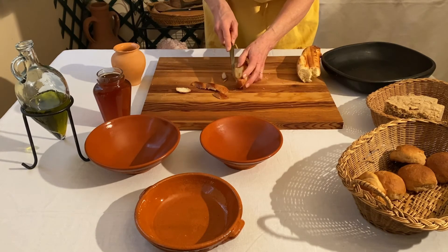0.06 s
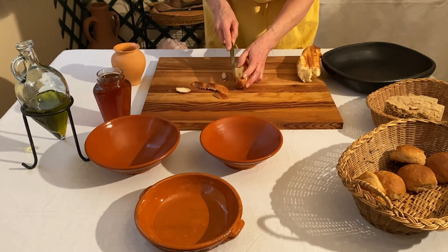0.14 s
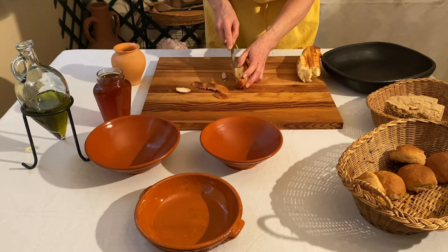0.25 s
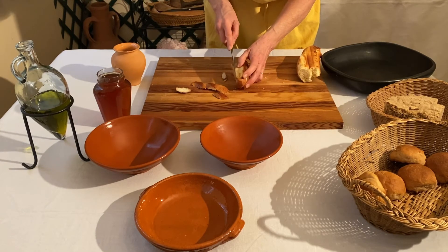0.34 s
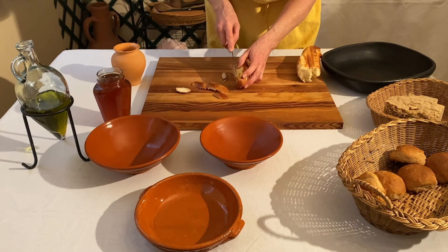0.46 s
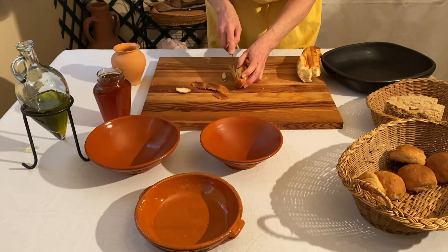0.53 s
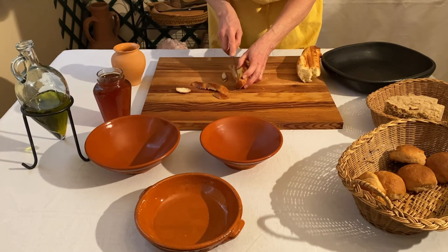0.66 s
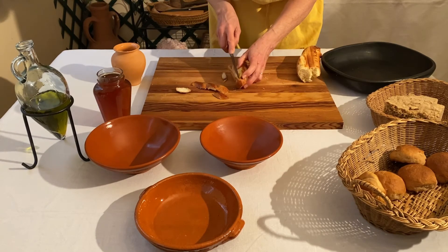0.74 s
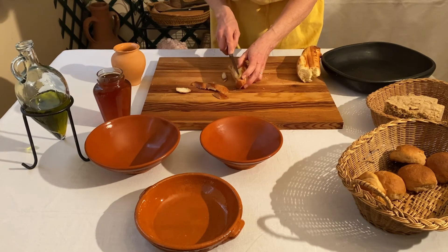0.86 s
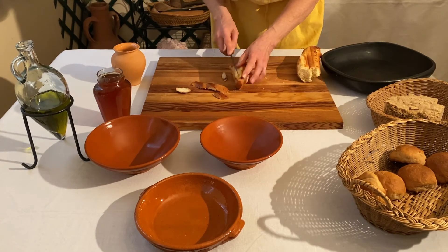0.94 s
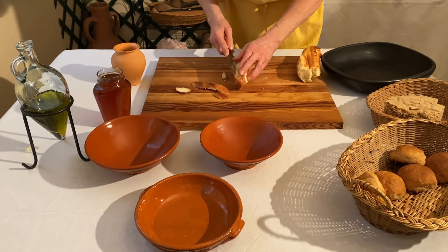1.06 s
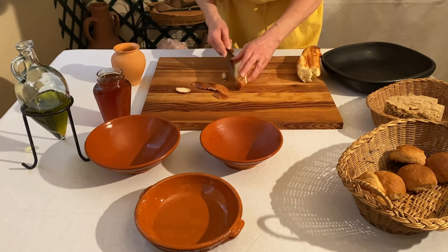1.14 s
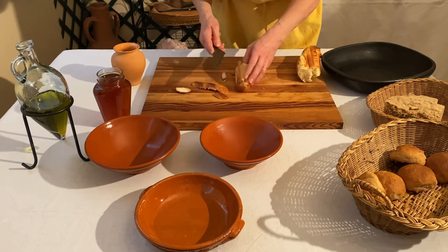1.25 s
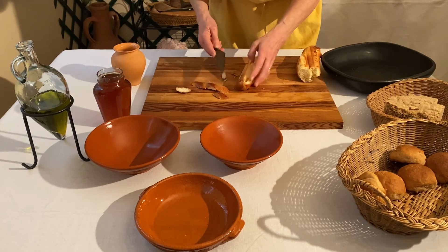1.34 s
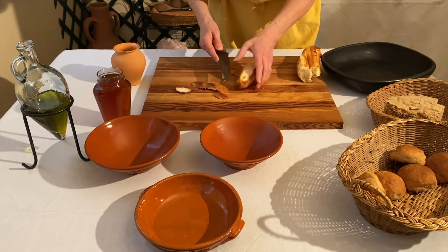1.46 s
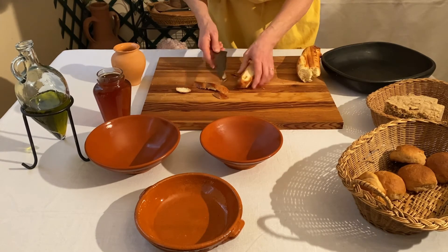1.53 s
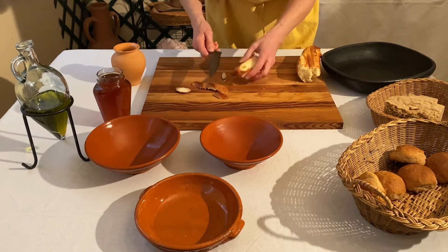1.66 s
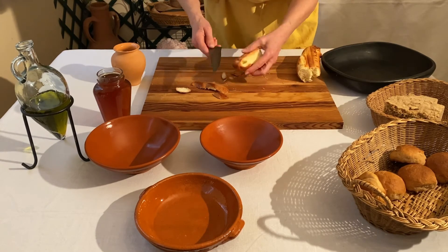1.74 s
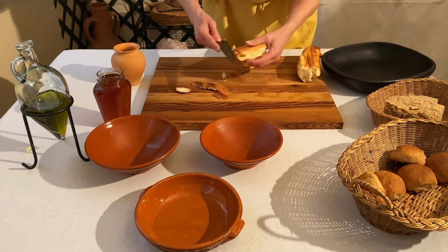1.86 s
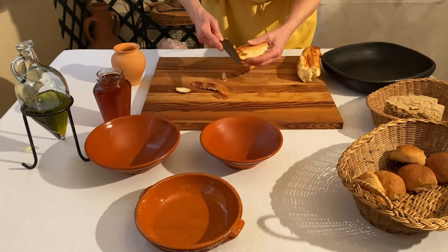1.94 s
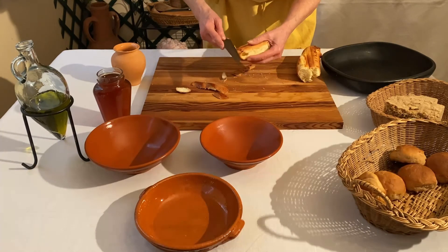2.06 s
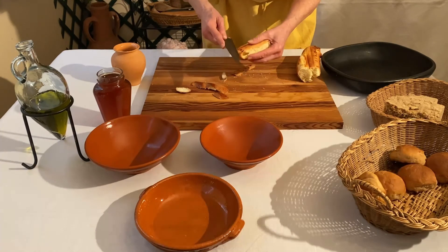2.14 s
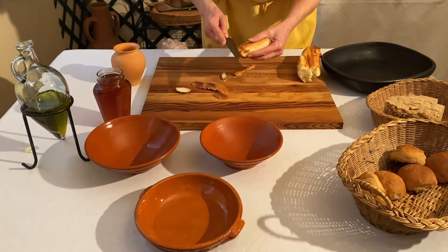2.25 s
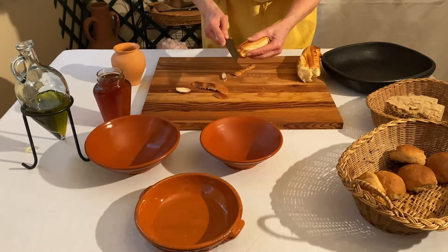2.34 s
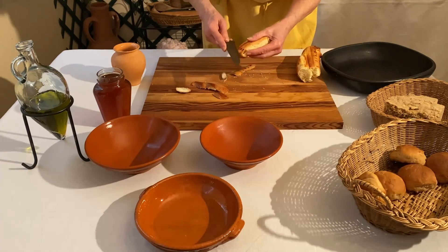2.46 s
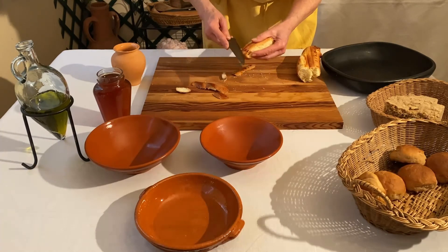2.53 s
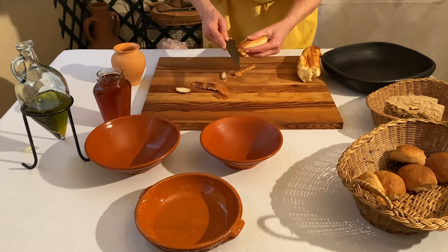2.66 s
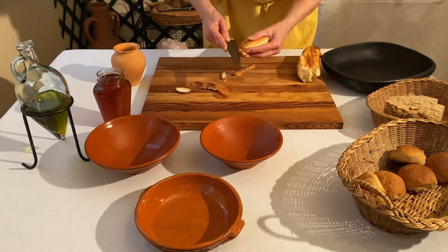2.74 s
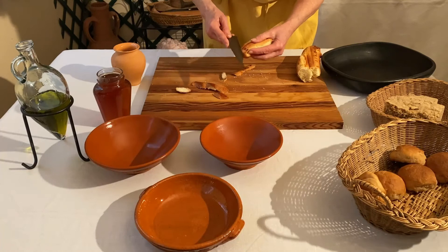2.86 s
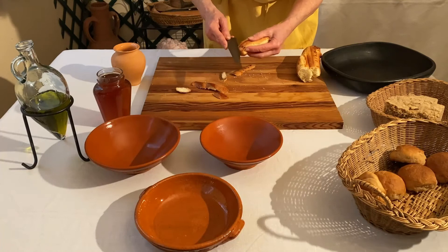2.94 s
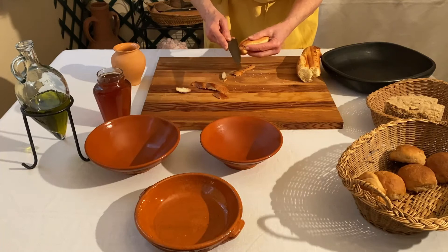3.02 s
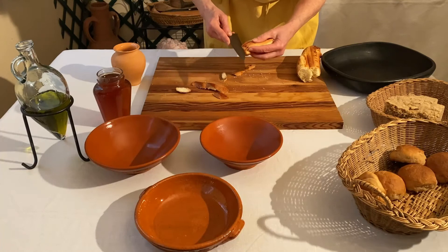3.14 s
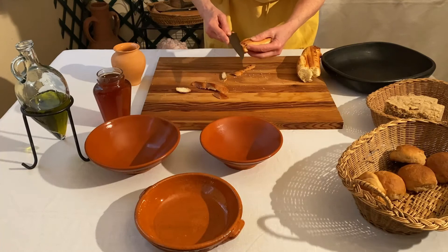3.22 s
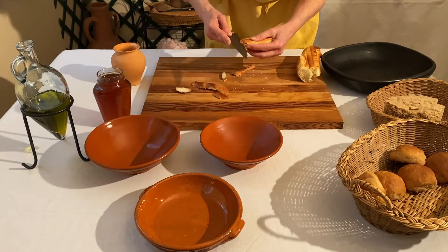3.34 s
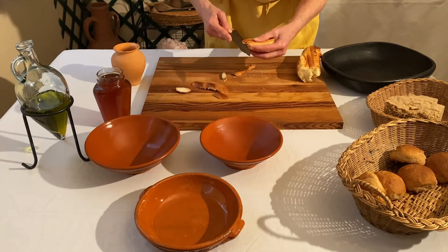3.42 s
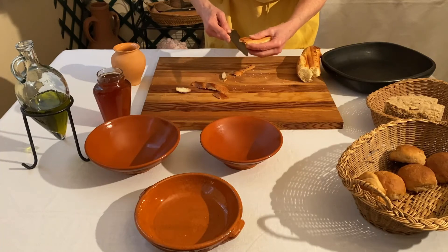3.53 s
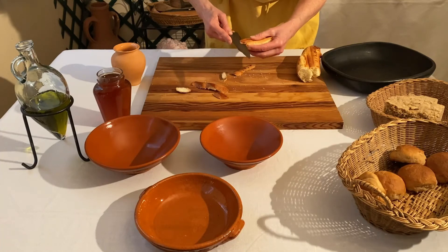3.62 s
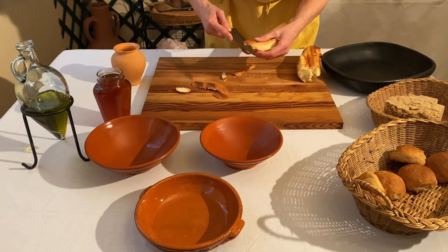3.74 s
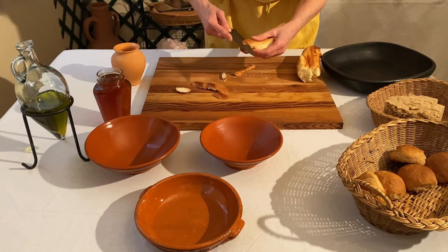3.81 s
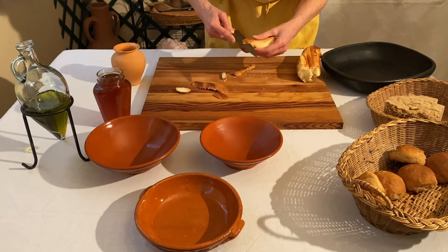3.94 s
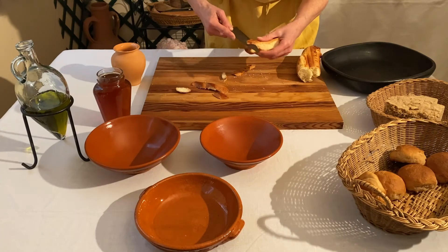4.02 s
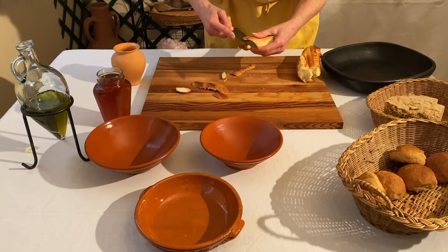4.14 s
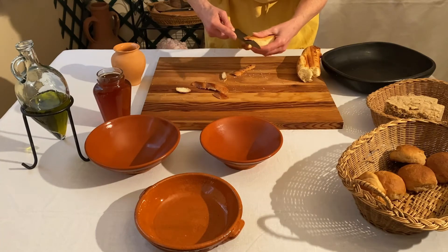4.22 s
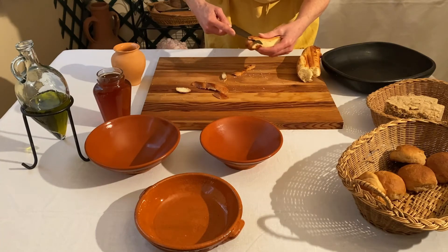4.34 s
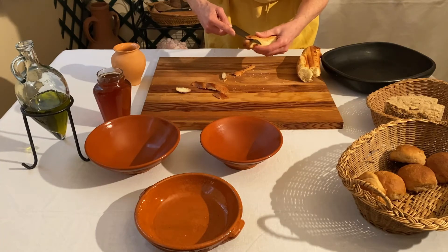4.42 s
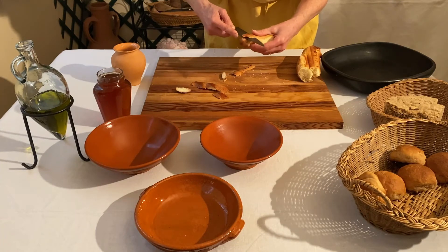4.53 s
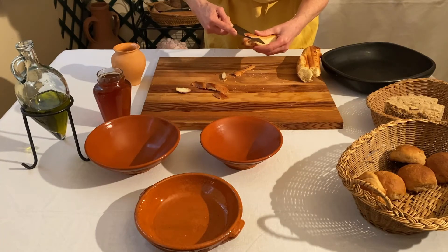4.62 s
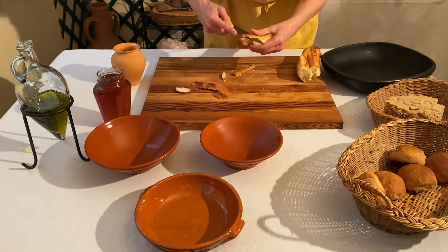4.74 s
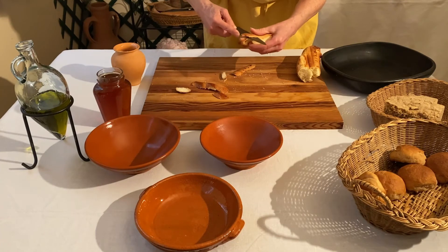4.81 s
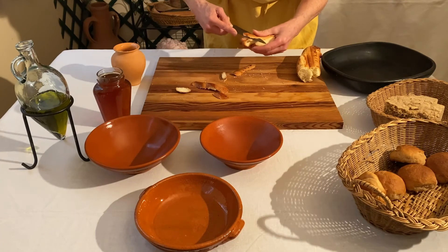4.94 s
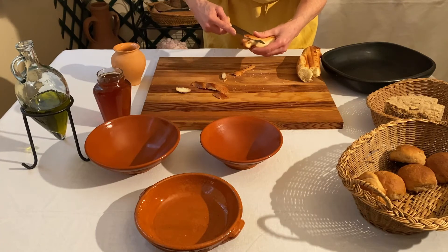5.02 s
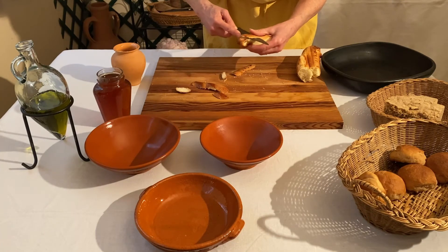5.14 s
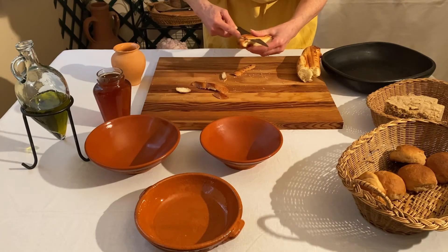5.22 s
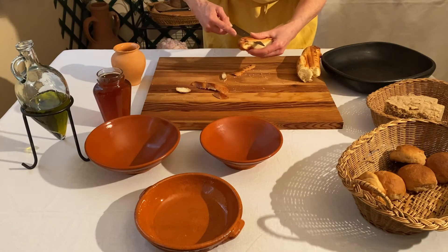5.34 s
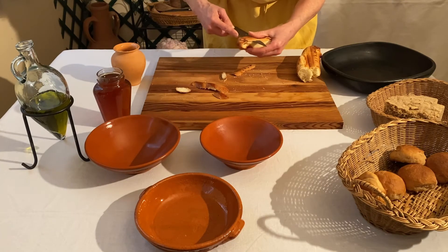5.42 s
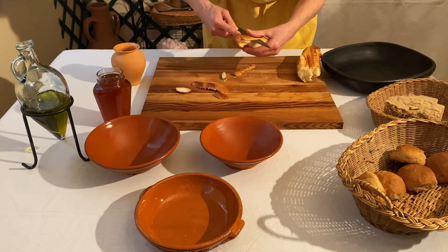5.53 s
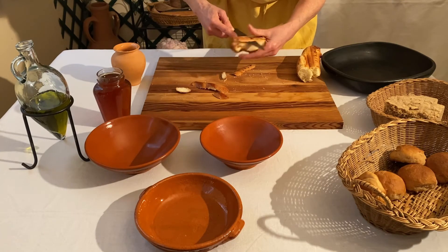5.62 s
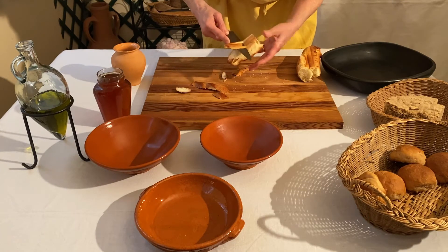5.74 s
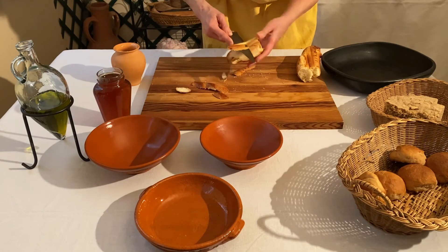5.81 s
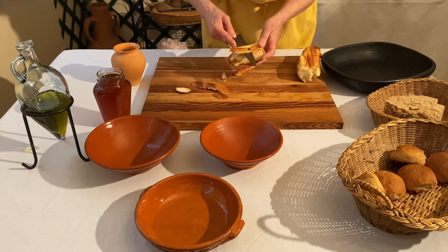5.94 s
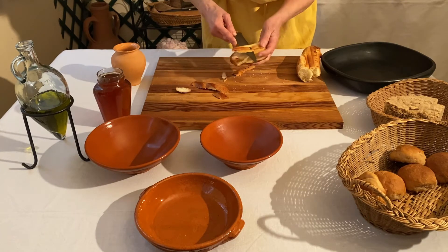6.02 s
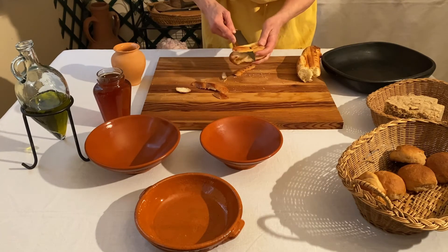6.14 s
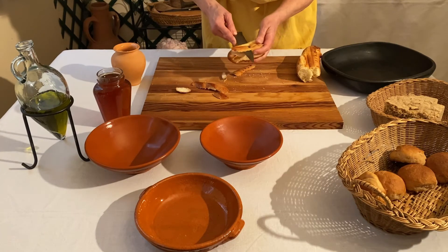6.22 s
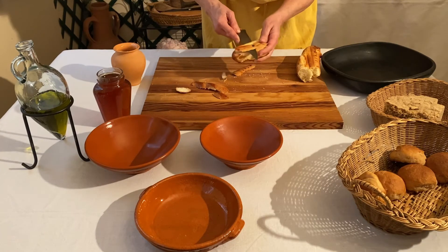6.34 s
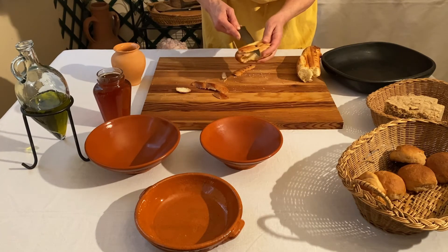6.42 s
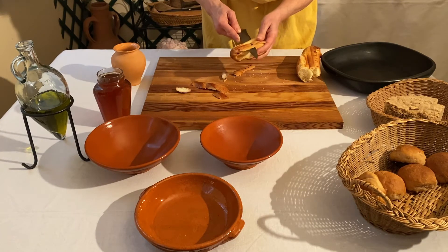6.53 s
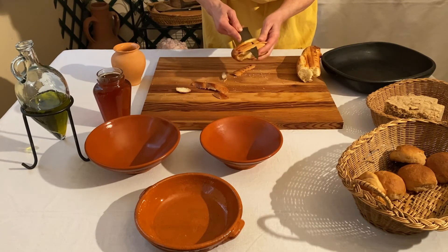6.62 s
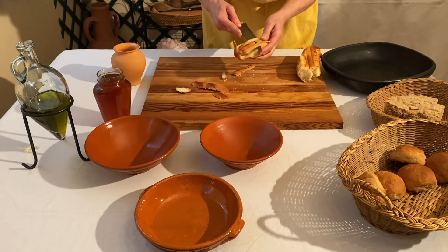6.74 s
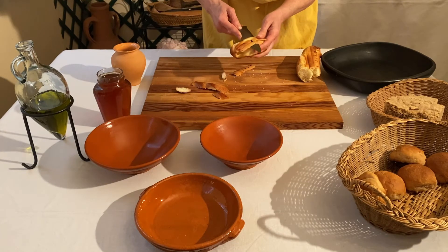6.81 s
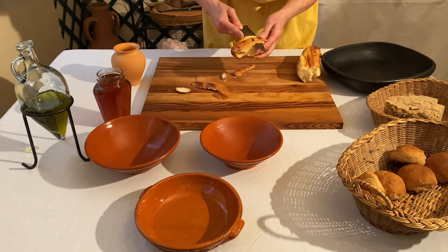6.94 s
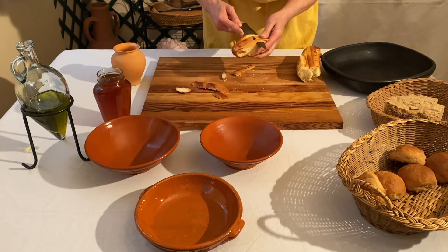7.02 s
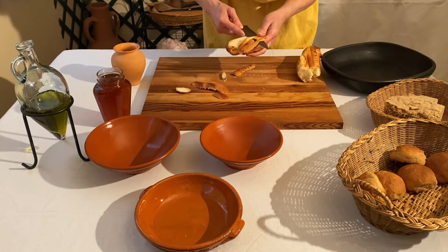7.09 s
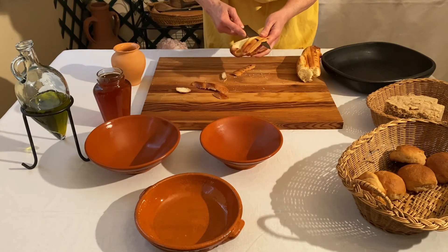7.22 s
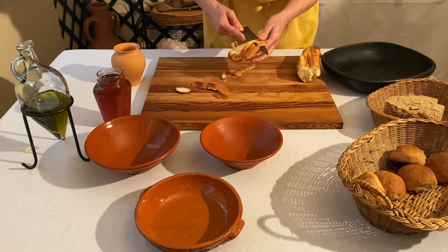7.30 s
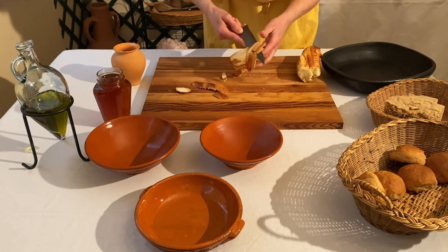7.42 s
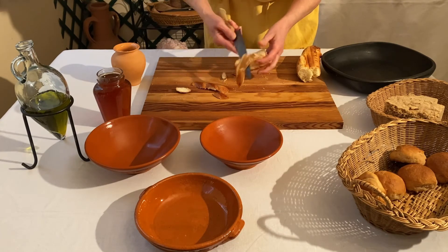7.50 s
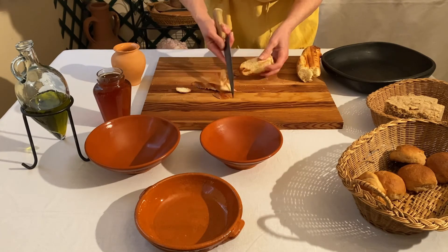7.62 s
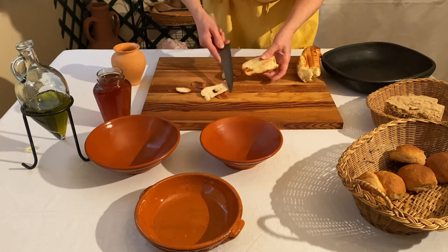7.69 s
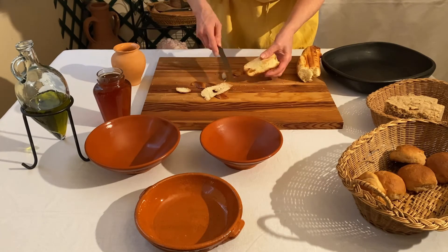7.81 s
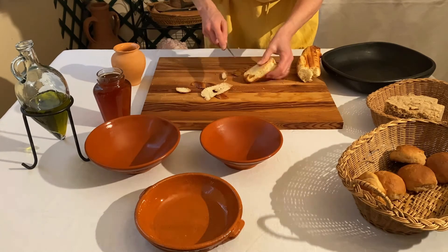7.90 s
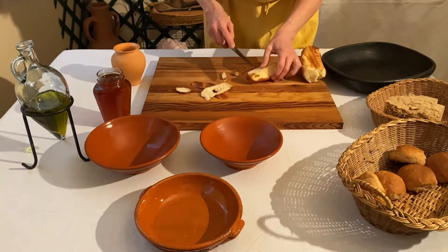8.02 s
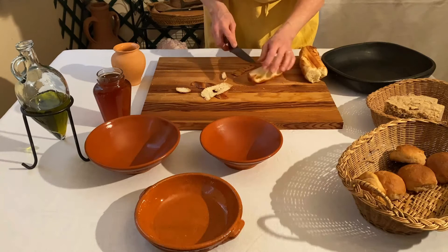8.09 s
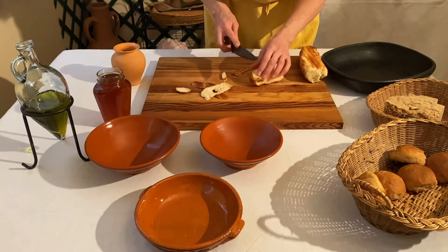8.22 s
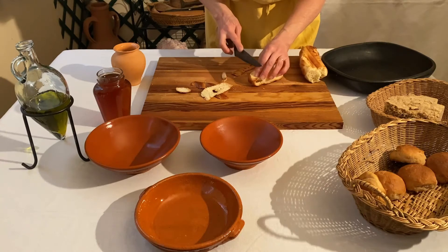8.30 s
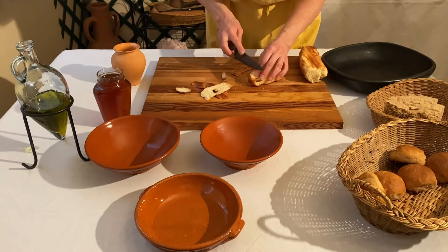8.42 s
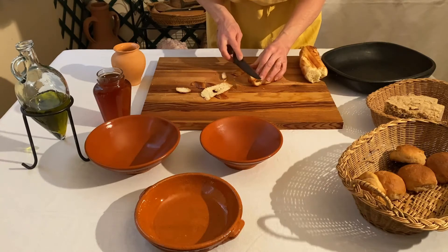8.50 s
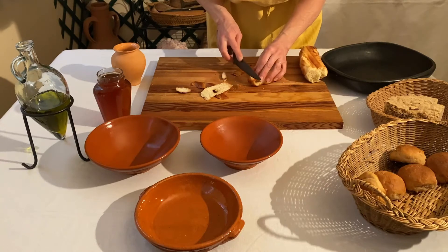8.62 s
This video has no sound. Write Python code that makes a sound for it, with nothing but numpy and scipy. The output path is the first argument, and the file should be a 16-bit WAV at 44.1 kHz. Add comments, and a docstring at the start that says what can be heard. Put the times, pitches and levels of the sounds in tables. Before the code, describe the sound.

Knife and bread roll on a wooden board, heard quietly by two close microphones indoors. First come uneven knocks, a narrow dry rasp and bright little blade rings; then a long run of light sawing, dry crust scratch with high metallic fizz, about seven strokes a second. A brief fumbling pause, more strokes, then the loudest knock, skittering crust and muffled thumps, over unsteady low hum and rumble.

```python
"""In a small, live room with a low swelling hum, a knife cuts a bread roll on a wooden board.
Knocks excite the board's modes, a narrow noise rasps near 2 kHz as the roll is handled, and touched
steel rings thinly. The roll is then held in the air and its crust sawn in quick, faint noise strokes.
At last a piece drops on the board with a sharp knock, crust skitters and the rest is set down.
Two closely spaced microphones hear the sounds with a dense decaying tail of room noise."""
import sys
import numpy as np
from scipy import signal
from scipy.fft import rfft, irfft
from scipy.io import wavfile

SR = 44100
rng = np.random.default_rng(int(sys.argv[2]) if len(sys.argv) > 2 else 0)


def file_out(sig):
    """Save sig as 16-bit WAV at sys.argv[1]."""
    # one column per channel
    cols = np.atleast_2d(sig).T
    # limit, then scale
    lim = np.clip(cols, -1, 1)
    pcm = np.round(lim * 32767).astype(np.int16)
    wavfile.write(sys.argv[1], SR, pcm)


N = 381766
TIME = np.arange(N) / SR  # s

# relative noise spectrum of grit at the steel edge: (f/Hz, density/dB)
FIZZ_SPECTRUM = [(100, -58), (3000, -4), (5500, -4), (7500, -4), (9000, 1.5), (11400, -4), (13000, 3),
                 (14500, 2.5), (15800, -9.5)]


def amp(db):
    """Logarithmic level: decibels to amplitude gain."""
    return 10 ** (np.asarray(db) / 20)


def unit(x):
    """Normalisation to a root-mean-square of 1."""
    return x / np.sqrt(np.mean(x ** 2) + 1e-20)


def read(points, hz):
    """Linear interpolation of a table on a logarithmic frequency axis."""
    f, value = np.transpose(points)
    return np.interp(np.log(hz + 1), np.log(f + 1), value)


def add(mix, s, sound):
    """Superposition: a sound is added in place from time s."""
    part = mix[max(round(s * SR), 0):][:len(sound)]
    part += sound[:len(part)]


def through(x, response):
    """Linear system: a sound convolved with an impulse response."""
    return signal.fftconvolve(x, response)[:N]


def colour(spectrum, size=4096):
    """Minimum phase: the causal response, of energy 1, that has the given relative spectrum."""
    log_gain = np.log(amp(read(spectrum, abs(np.fft.fftfreq(size, 1 / SR)))))
    response = np.fft.ifft(np.exp(np.conj(signal.hilbert(log_gain)))).real
    return response / np.linalg.norm(response)


def ring(modes):
    """Modal superposition: exponentially dying sines, with total energy 1."""
    t = TIME[:SR]
    response = np.zeros(SR)
    for k, (hz, db, t60) in enumerate(modes):
        sign = (-1) ** k
        response += sign * amp(db - 60 * t / t60) * np.sin(2 * np.pi * hz * t)
    return response / np.linalg.norm(response)


def resonances(peaks):
    """Bandwidth and decay are reciprocal: broad peaks become quickly dying modes, with energy 1."""
    modes = []
    for hz, width_hz, db in peaks:
        t60 = np.log(1000) / np.pi / width_hz
        modes.append((hz, db + 20 * np.log10(width_hz), t60))
    return ring(modes)


def resonate(x, hz, width_hz):
    """Heterodyne resonator: a one-pole filter in a frame that turns with hz, with gain 1 at its peak."""
    turn = np.exp(2j * np.pi * np.cumsum(hz) / SR)
    r = np.exp(-np.pi * width_hz / SR)
    baseband = signal.lfilter([1 - r], [1, -r], x / turn + 1e-18)
    return 2 * (turn * baseband).real


def burst(envelope):
    """Transient noise: an enveloped puff with energy 1."""
    noise = rng.standard_normal(len(envelope)) * envelope
    return noise / np.linalg.norm(noise)


def wander(rate_hz):
    """Low-pass random process: slow Gaussian motion of rms 1."""
    hz = np.fft.rfftfreq(N, 1 / SR)
    return unit(irfft(rfft(rng.standard_normal(N)) * np.exp(-(hz / rate_hz) ** 2), N))


def crumbs(per_s, spread_db, smooth):
    """Shot noise: tiny random impulses of uneven size over smooth noise."""
    sizes = amp(spread_db * np.minimum(rng.exponential(1, N), 4)) * rng.choice([-1, 1], N)
    impulses = unit(sizes * (rng.random(N) < per_s / SR))
    return unit(impulses + smooth * rng.standard_normal(N))


def diffuse(pair):
    """Spatial coherence: common and opposed parts set how alike the two microphones sound per band."""
    # coherence of the sound at the microphones: (f/Hz, correlation)
    coherence = [(40, 1), (130, 0.71), (250, 0.76), (450, 0.01), (1300, 0.021), (2200, 0.45), (5300, 0.35),
                 (7000, 0.99), (16000, 0.89)]
    size = pair.shape[1]
    same = np.clip(read(coherence, np.fft.rfftfreq(size, 1 / SR)), -1, 1)
    mid, side = rfft(pair) * np.sqrt([(1 + same) / 2, (1 - same) / 2])
    return irfft(np.array([mid + side, mid - side]), size)


def room(x, wet_db, left_db, build_s=0.00044):
    """Reverberation: direct sound plus a dense noise tail whose treble dies faster."""
    # reverberation of the room: (f/Hz, t60/s)
    reverberation = [(100, 0.56), (500, 0.39), (2000, 0.26), (6000, 0.22), (15000, 0.1)]
    hz, t, z = signal.stft(diffuse(rng.standard_normal((2, SR))), SR, nperseg=256)
    decay = amp(-60 * t / read(reverberation, hz)[:, None])
    tail = signal.istft(z * decay, SR, nperseg=256)[1][:, :SR]
    build = 1 - np.exp(-(TIME[:SR] / build_s) ** 2)
    tail *= build / np.sqrt(np.sum(tail ** 2) / 2)
    pair = x + amp(wet_db) * np.array([through(x, side) for side in tail])
    balance = amp([[left_db / 2], [-left_db / 2]])
    return pair * balance / np.hypot(1, amp(wet_db))


def ambience(lump_db=5.5):
    """Diffuse background: lumpy low rumble, faint hiss and steady pure tones."""
    # relative noise spectrum of the air: (f/Hz, density/dB)
    air_spectrum = [(20, -23), (30, -14.5), (45, 5.5), (80, -1.5), (115, 4.5), (160, -5), (220, -15.5),
                    (400, -16), (750, -24), (1200, -29), (2200, -33), (4500, -38), (9000, -43.5),
                    (13000, -42), (16000, -56)]
    # faint steady tones: (f/Hz, rms level/dB)
    tones = [(437, -80), (778, -82)]
    noise = diffuse(rng.standard_normal((2, N)))
    air = amp(-52.0) * unit(np.array([through(side, colour(air_spectrum)) for side in noise]))
    rumble = signal.sosfiltfilt(signal.butter(2, 250, fs=SR, output="sos"), air)
    lumps = amp(lump_db * np.tanh(wander(rate_hz=6.2)))
    whine = sum(np.sqrt(2) * amp(db) * np.sin(2 * np.pi * hz * TIME) for hz, db in tones)
    return air - rumble + rumble * lumps + whine


def hum(centre_hz=132.5, drift_hz=4.11, flutter=0.32, throb_db=4.0, throb_hz=7):
    """Amplitude and frequency modulation: a low sine swells, throbs at random and wavers in pitch."""
    # slow swell, before throb and channel balance: (t/s, level/dB)
    swell = [(0, -66), (.5, -62), (.58, -41), (.69, -67), (.8, -52.5), (.91, -42), (1.02, -49.5),
             (1.09, -60), (1.28, -52), (1.66, -51), (1.83, -58.5), (1.95, -61), (2.1, -59), (2.4, -71),
             (2.62, -59.5), (2.93, -59), (3.02, -43.5), (3.2, -48), (3.36, -74), (3.85, -50.5),
             (4.3, -63.5), (4.53, -48), (4.8, -67), (5.03, -50), (5.3, -59.5), (5.55, -47.5), (5.65, -37),
             (5.76, -75), (5.89, -44.5), (6.0, -64), (6.35, -50), (6.75, -62.5), (7.05, -56.5),
             (7.19, -44.5), (7.33, -65.5), (7.49, -42.5), (7.6, -50), (7.8, -42), (7.95, -49),
             (8.08, -33.5), (8.2, -43), (8.35, -44.5), (8.5, -56.5), (8.66, -56)]
    turns = np.cumsum(centre_hz + drift_hz * wander(rate_hz=18.5)) / SR
    throb = throb_db * np.tanh(wander(rate_hz=throb_hz))
    level = amp(np.interp(TIME, *np.transpose(swell)) + throb)
    level = level * (1 + flutter * wander(rate_hz=25.0))
    balance = amp([[-3.5], [.8]])  # left, right
    return np.sqrt(2) * level * np.sin(2 * np.pi * turns) * balance


def sliding(rise_s=0.0076, handling_db=-76.5):
    """Dry friction: fine grains of bread and hands on wood build, hold and die away with each push."""
    # bread pushed over the board: (start t/s, end t/s, relative level/dB, fall/(dB per s))
    pushes = [(-.05, 0.01, -58.5, 54), (0.483, 1.175, -65.5, 70), (1.179, 1.267, -59, 90),
              (1.297, 1.615, -58.5, 74), (1.846, 1.962, -67, 45), (5.454, 5.505, -59.5, 218),
              (5.797, 6.25, -68, 68), (7.555, 7.817, -56.5, 86), (7.924, 8.026, -51, 93)]
    # relative noise spectrum of the friction: (f/Hz, density/dB)
    friction_spectrum = [(40, 0.5), (150, -5), (400, -0.5), (800, -2), (1300, -7), (2200, -9.5),
                         (4000, -25.5), (8000, -35), (16000, -33)]
    level = np.full(N, amp(handling_db))  # between pushes the fingers keep rubbing the crust
    for start, end, db, fall_db_per_s in pushes:
        rise = np.clip((TIME - start) / rise_s, 0, 1)
        level = np.maximum(level, rise * amp(db - fall_db_per_s * np.maximum(TIME - end, 0)))
    grains = crumbs(per_s=1100, spread_db=3.2, smooth=.6)
    unsteady = amp(5.7 * np.tanh(wander(rate_hz=33)))
    return room(through(level * unsteady * grains, colour(friction_spectrum)), wet_db=0, left_db=3.0)


def knocks(snap_s=0.0011, uneven=0.14):
    """Impact excitation: force pulses drive board and crust, and longer contacts sound duller."""
    # knocks of bread and knife on the board, levels relative: (t/s, thud level/dB, first contact/ms,
    # crust crack level/dB, change per rebound/dB, board ring against thud/dB)
    impacts = [(.575, -15, 3.45, -39, -17, 4), (1.111, -21.5, 3.1, -33, -20, 2),
               (1.213, -25.5, 0.22, -24.5, -6, -5), (1.252, -29, 0.34, -24, -13, 6),
               (1.534, -22.5, 0.6, -23.5, 2, 10), (1.679, -31, 0.55, -32, -11, 9),
               (1.864, -14, 2.3, -52, -7, -4), (1.888, -10.5, 2.46, -44, -22, -4),
               (1.925, -21, 0.33, -25.5, -23, -11), (5.498, -27, 0.78, -43, -22, -4),
               (5.804, -30, 0.94, -36, -0.5, -2), (6.609, -27.5, 0.76, -48, -24, -7),
               (7.565, -14, 1.5, -27, -24, 7.5), (7.6472, -11, 0.15, -15.5, -18, 2.5),
               (7.651, -0.5, 0.73, -29, -20, 5), (7.686, -15.5, 0.17, -29, 1.5, 0),
               (7.914, -16, 1.26, -22.5, -14, 4), (7.964, -27, 0.49, -24, -11, 4),
               (7.996, -9.5, 0.9, -26.5, -23, -8), (8.03, -12, 2.3, -26, -13, -8),
               (8.048, -4, 3.2, -54, -21, -9), (8.085, -12, 3.2, -59, -19, -6),
               (8.15, -28, 0.39, -44, -11, 0), (8.268, -24, 1, -45.5, -2.5, -2),
               (8.547, -32.5, 1.1, -46, -16, -2)]
    # modes of the wooden board: (f/Hz, relative level/dB, t60/s)
    board_modes = [(132, -15, .6), (165, -15, .3), (234, -11, .38), (326, -10.5, .2), (430, -5, .26),
                   (529, -1.5, .42), (555, -5, .28), (590, 9.5, .04), (696, -5, .18), (817, -8, .25),
                   (855, -12, .22), (944, -10, .25), (985, -5, .07), (1043, -14, .25), (1346, -13, .3),
                   (1420, -16, .2), (1782, -14, .28), (1945, -18, .25), (2520, -7.5, .36), (2680, -9, .2),
                   (2923, -15, .25), (3445, -18, .3), (3850, -18, .2), (4177, -17, .25), (5534, -19, .25)]
    # relative spectrum of the thud: (f/Hz, density/dB)
    thud_spectrum = [(40, -17), (80, 4), (170, -5.5), (330, 1.5), (550, 1.5), (950, 0), (1200, -15.5),
                     (2000, -11.5), (2800, -6), (4000, -29), (16000, -30)]
    # relative spectrum of the cracking crust: (f/Hz, density/dB)
    crack_spectrum = [(100, -8), (700, 5), (1500, 20), (2800, 8.5), (4000, 11.5), (6500, 2.5), (9000, -11),
                      (12000, 0.5), (16000, 2)]
    rebounds, rebound_s = 2, .035  # the bread rocks to rest
    soften = 1.8  # each contact lasts this many times longer than the last
    rebound_ring_db = -5.5  # the settling bread damps the board
    thud, flex, crack = np.zeros((3, N))
    t = TIME[:SR // 20]
    for s, thud_db, contact_ms, crack_db, rebound_db, ring_db in impacts:
        for k in range(1 + rebounds):
            at = s + k * rebound_s * (1 + uneven * rng.uniform(-1, 1))
            push = np.sin(np.pi * np.minimum(1000 * t / (contact_ms * soften ** k), 1)) ** 2
            push = push / push.sum()
            flex_db = thud_db + ring_db + k * (rebound_db + rebound_ring_db)
            snap = burst(np.exp(-t / snap_s))
            add(thud, at, amp(thud_db + k * rebound_db) * push)
            add(flex, at, amp(flex_db) * push)
            add(crack, at, amp(crack_db + k * rebound_db) / soften ** k * snap)
    body = room(amp(2.0) * through(thud, colour(thud_spectrum)), wet_db=3.5, left_db=0.5)
    modes = room(amp(-1) * through(flex, ring(board_modes)), wet_db=-8, left_db=3.5)
    crust = room(amp(1.0) * through(crack, colour(crack_spectrum)), wet_db=4.5, left_db=1.5)
    return body + modes + crust


def blade(tick_s=0.0011, graze_s=0.009, swell_s=0.013, left_db=0.5):
    """Modal damping: free steel rings on, held steel swells to a short gritty note, bent steel sounds low."""
    # the blade touches board or crust, levels relative: (t/s, tick level/dB, free ring level/dB,
    # ring held against the bread level/dB, low bending note level/dB)
    touches = [(1.112, -24.5, -45, -52, -50), (1.203, -31, -50, -23, -44), (1.533, -29, -25, -41, -45),
               (1.927, -30, -46, -48, -40), (5.803, -37, -48, -46, -55), (7.097, -44, -60, -73, -65),
               (7.647, -31, -50, -43, -45), (7.934, -31, -55, -44, -50), (8.227, -54, -49, -27.5, -28)]
    # modes of the free blade: (f/Hz, relative level/dB, t60/s)
    free_modes = [(2665, -14, .28), (4350, -16, .4), (5500, -14, .25), (7850, -14, .3), (10590, -1, .44),
                  (11830, -7, .46), (15220, -13, .25)]
    # modes of the blade held against the bread: (f/Hz, relative level/dB, t60/s)
    held_modes = [(3850, -15, .08), (6600, -11, .08), (9330, -3, .09), (10910, 3, .08), (12600, -3, .07),
                  (14160, -3, .06), (14750, -7, .06)]
    # mode of the bending blade: (f/Hz, relative level/dB, t60/s)
    bent_modes = [(2265, 0, .16)]
    tick, graze, free, held, bent = np.zeros((5, N))
    t = TIME[:SR // 10]
    for s, tick_db, free_db, held_db, bent_db in touches:
        add(tick, s, amp(tick_db) * burst(np.exp(-t / tick_s)))
        add(graze, s, amp(held_db) * burst(t * np.exp(-t / graze_s)))
        add(free, s, amp([free_db]))
        add(held, s, amp([held_db]))
        add(bent, s + graze_s, amp([bent_db]))  # the steel springs back at the height of the graze
    swell = 1 - np.exp(-(TIME[:SR] / swell_s) ** 2)
    grit = through(tick + amp(-5.0) * graze, colour(FIZZ_SPECTRUM))
    steel = through(free, ring(free_modes))
    steel = steel + amp(9) * through(held, swell * ring(held_modes))
    steel = steel + through(bent, swell * ring(bent_modes))
    contact = room(amp(5.5) * grit, wet_db=2.5, left_db=left_db)
    return contact + room(amp(3.0) * steel, wet_db=-8, left_db=left_db)


def narrow_rasp(waver_oct=.035, catch_db=0.5):
    """Filtered noise: uneven grains through narrow, wavering resonances make a faint rasp near 2 kHz."""
    # faint narrow rasps during handling: (start t/s, end t/s, level/dB, centre f/Hz)
    rasps = [(1, 1.323, -67, 1900), (1.047, 1.07, -62, 1930), (1.315, 1.506, -59, 1870),
             (2.942, 3.2, -75, 1980), (3.367, 3.5, -68.5, 1850), (3.688, 3.747, -68.5, 2150),
             (3.837, 3.88, -73, 2070), (3.98, 4.05, -73, 1880), (4.12, 4.17, -73, 1950),
             (4.284, 4.66, -77, 1810), (4.436, 4.48, -73, 1800), (5.45, 5.495, -64, 1990),
             (5.7, 5.808, -72, 1770), (5.87, 5.93, -72, 1890), (5.907, 6.215, -73, 1800),
             (7.535, 7.915, -59.5, 2000)]
    rise_s, fall_db_per_s = 0.007, 260
    width_hz = 340  # of each of two cascaded resonators
    partials = [(1, 0), (1.555, -14)]  # frequency ratio, level/dB: a weaker, higher resonance
    out = np.zeros(N)
    grains = crumbs(per_s=450, spread_db=2.0, smooth=0.23)
    grains = grains * amp(catch_db * np.tanh(wander(rate_hz=20)))
    waver = 2 ** (waver_oct * wander(rate_hz=15))
    for start, end, db, hz in rasps:
        first = round(start * SR)
        part = slice(first, first + SR)
        t = np.maximum(TIME[part] - start, 0)
        fall_db = fall_db_per_s * np.maximum(t - (end - start), 0)
        level = np.minimum(t / rise_s, 1) * amp(db - fall_db)
        for ratio, share_db in partials:
            pitch = ratio * hz * waver[part]
            rasp = resonate(resonate(grains[part], pitch, width_hz), pitch, width_hz)
            add(out, start, amp(share_db) * level * unit(rasp))
    return room(out, wet_db=-9.0, left_db=1.0)


def sawing(sharpness=1.58, bite=1.0, catch_db=1.5, snag_db=2.0):
    """Speed-driven fracture noise: crumbling crust and a singing edge swell and fade in each stroke."""
    # strokes of the blade, and crust skittering after the drop, levels relative:
    # (middle t/s, crust rasp level/dB, fizz level/dB)
    strokes = [(0.587, -71, -71), (0.77, -73.5, -68.5), (0.947, -71, -73), (1.125, -64, -72.0),
               (1.242, -57, -63), (1.35, -67, -75), (1.46, -70.5, -74), (1.56, -60, -68), (1.69, -69, -73),
               (1.875, -68.5, -64), (2.03, -68, -80), (2.415, -73.5, -70), (2.555, -71.5, -60),
               (2.687, -71.5, -61.5), (2.824, -70, -61), (2.962, -75, -62), (3.117, -65.5, -60.5),
               (3.27, -75.5, -63), (3.415, -70, -61.5), (3.556, -78, -69), (3.718, -71, -63.5),
               (3.865, -71.5, -66.5), (4.013, -66, -61.5), (4.153, -73, -67.5), (4.327, -68.5, -65),
               (4.463, -74.5, -63.5), (4.637, -71.5, -66.5), (4.772, -73, -69.5), (4.975, -77, -65.5),
               (5.125, -69, -66), (5.299, -73, -64), (5.472, -66.5, -62), (5.77, -83, -71),
               (6.063, -96, -69.5), (6.195, -76.5, -67), (6.393, -69, -63.5), (6.527, -70, -65.5),
               (6.694, -72, -66.5), (6.831, -71.5, -66.5), (6.98, -76, -66.5), (7.129, -73, -61),
               (7.7, -57, -65), (7.964, -56.5, -68), (8.65, -67, -63.5)]
    # how freely the blade sings while it saws: (t/s, relative level/dB)
    singing_curve = [(.5, 3), (1.2, -8), (2.9, 0), (3.5, -3.5), (5.5, -6.5), (6.1, -1), (6.5, -3.5)]
    # resonances of the sawing edge: (f/Hz, width/Hz, relative level/dB)
    edge_peaks = [(9330, 250, -8), (10930, 260, 1), (12650, 350, 0), (14300, 550, 0)]
    # relative noise spectrum of the crumbling crust: (f/Hz, density/dB)
    rasp_spectrum = [(60, -31), (170, 8), (300, 8), (600, 13.5), (1200, 3), (2000, 8.5), (3200, 4.5),
                     (5000, 1.5), (7500, -3.5), (10000, -5), (16000, -7)]
    stroke_s, slow_start_s, warm_up_s = 0.15, 0.077, 0.68  # early strokes last longer, then settle
    lifted_from_s, lifted_until_s = 2.2, 7.4  # the roll is in the air, its crust free to resonate
    lifted_cut_hz = 790  # away from the board the rasp loses its low body
    crust_hz, crust_width_hz, crust_spread_oct = 2220, 1900, 0.088

    on_board, in_air, fizz, patch = np.zeros((4, N))
    # the patch of crust under the blade resonates anew in each stroke
    patch_hz = crust_hz * 2 ** (crust_spread_oct * rng.standard_normal(len(strokes)))
    grains = crumbs(per_s=2800, spread_db=0.5, smooth=0.85) * amp(catch_db * wander(rate_hz=55))
    snags = unit(amp(snag_db * np.tanh(wander(rate_hz=36))))
    flakes = snags * crumbs(per_s=380, spread_db=3.3, smooth=.38)  # coarser pieces break off
    for (middle, rasp_db, fizz_db), hz in zip(strokes, patch_hz):
        length = stroke_s + slow_start_s * np.exp((strokes[0][0] - middle) / warm_up_s)
        speed = np.sin(np.linspace(0, np.pi, round(length * SR))).clip(0) ** sharpness
        start = middle - length / 2
        lifted = lifted_from_s < middle < lifted_until_s
        rasp = amp(rasp_db) * speed ** bite
        add(in_air if lifted else on_board, start, rasp)
        add(fizz, start, amp(fizz_db) * speed)
        if lifted:
            scrape = rasp * flakes[round(start * SR):][:len(speed)]
            limits = [hz - crust_width_hz / 2, hz + crust_width_hz / 2]
            band = signal.butter(2, limits, "band", fs=SR, output="sos")
            add(patch, start, signal.sosfilt(band, scrape))
    thin = signal.sosfilt(signal.butter(2, lifted_cut_hz, "high", fs=SR, output="sos"), flakes * in_air)
    crust = amp(4.5) * through(flakes * on_board + thin, colour(rasp_spectrum)) + amp(6.0) * patch
    hiss = through(grains * fizz, colour(FIZZ_SPECTRUM))
    singing = amp(np.interp(TIME, *np.transpose(singing_curve)))
    edge_drive = fizz * singing * crumbs(per_s=2200, spread_db=-13, smooth=0.56)
    edge = through(edge_drive, resonances(edge_peaks))
    steel = room(amp(1.5) * (hiss + edge), wet_db=-5.5, left_db=0.0)
    return room(crust, wet_db=2.5, left_db=3.0) + steel


def scene():
    """Superposition of knife, bread and board in the humming room."""
    background = ambience() + hum()
    contacts = sliding() + knocks() + blade()
    return background + contacts + narrow_rasp() + sawing()


def record(dry):
    """Linear filtering: a phase shift between the channels, a bass cut and a steep treble limit."""
    # phase between the channels: (f/Hz, lead of the left/rad)
    phase_lead = [(0, 0), (600, .4), (3000, .5), (4500, .2), (7400, 0), (8800, -3.1), (9400, -3.4),
                  (10800, -6.1), (11600, -6.4), (13200, -9.4), (13600, -9.6), (15000, -12.5)]
    bass_cut_hz, treble_limit_hz = 28, 15850
    phase = np.interp(np.fft.rfftfreq(N, 1 / SR), *np.transpose(phase_lead))
    pair = irfft(rfft(dry) * np.exp(.5j * np.array([phase, -phase])), N)
    pair = signal.sosfilt(signal.butter(3, bass_cut_hz, "high", fs=SR, output="sos"), pair)
    low_pass = signal.firwin(511, treble_limit_hz, window=("kaiser", 9), fs=SR)
    return signal.oaconvolve(pair, low_pass[None], "same")


dry = scene()
out = record(dry)
file_out(out)
```